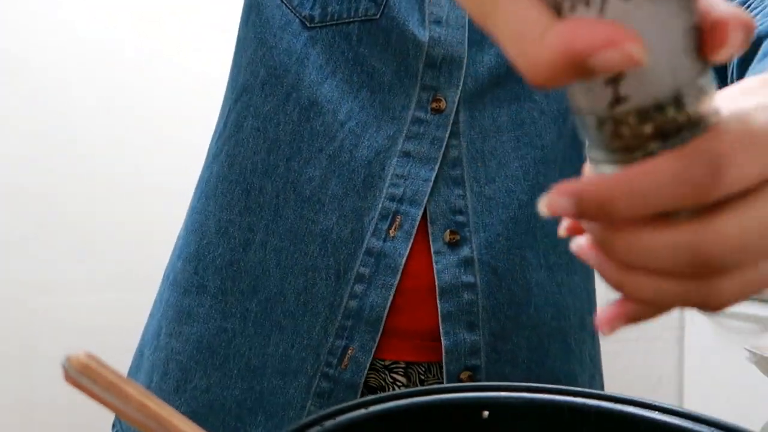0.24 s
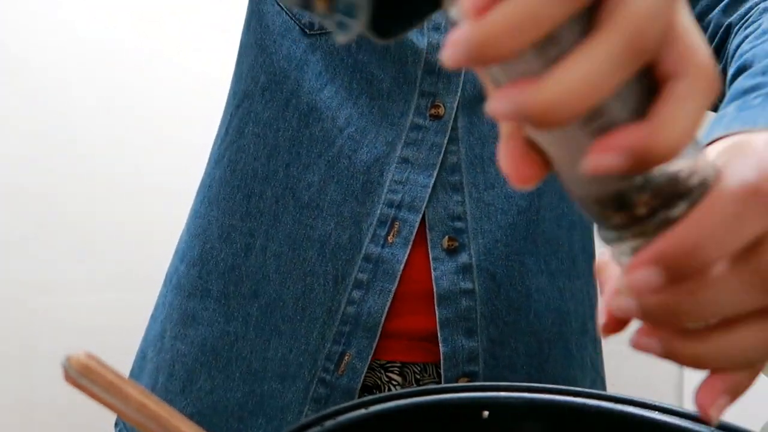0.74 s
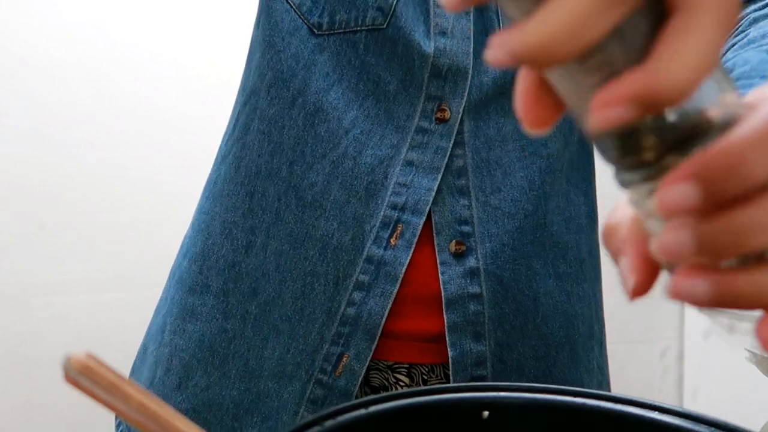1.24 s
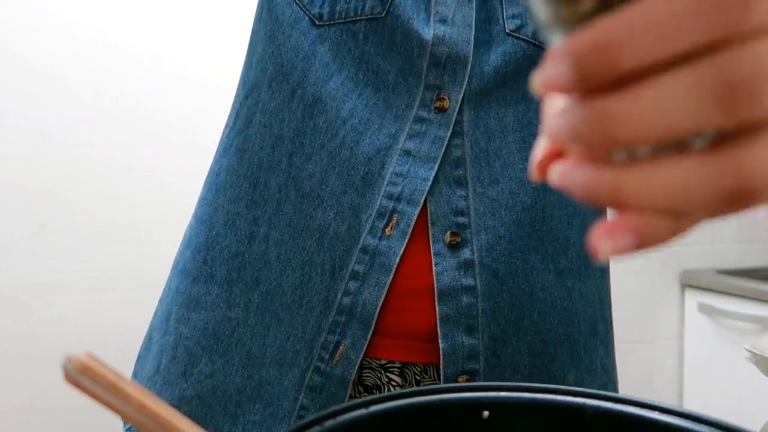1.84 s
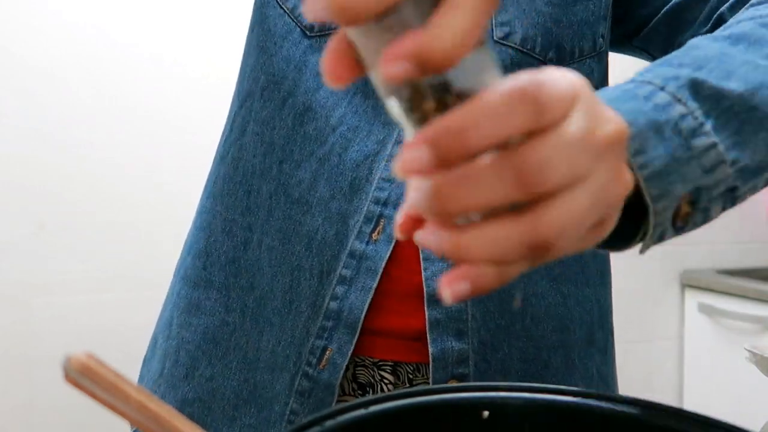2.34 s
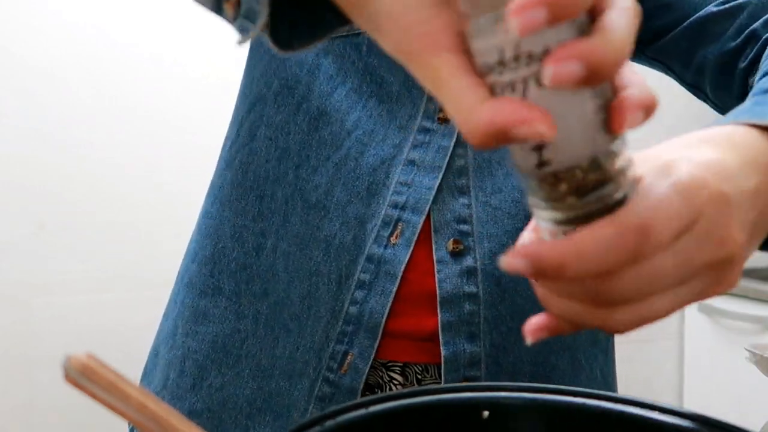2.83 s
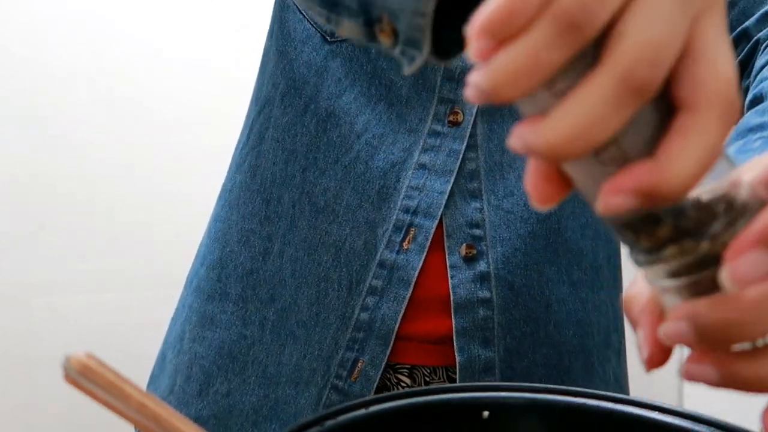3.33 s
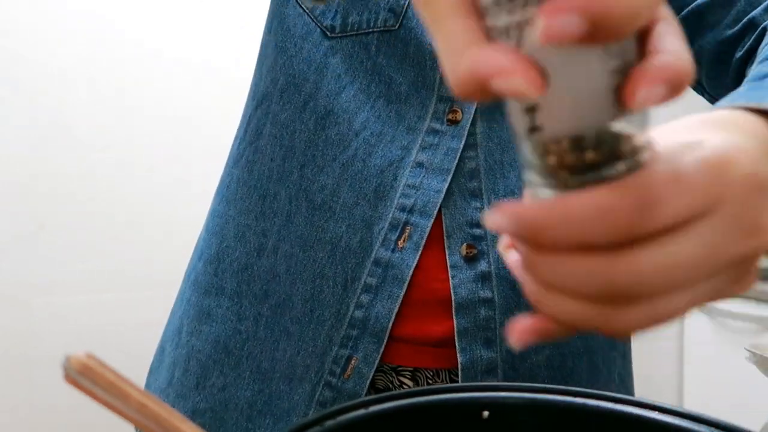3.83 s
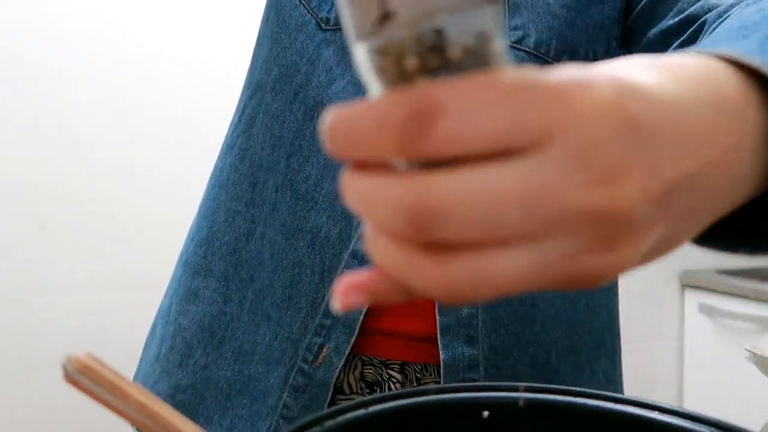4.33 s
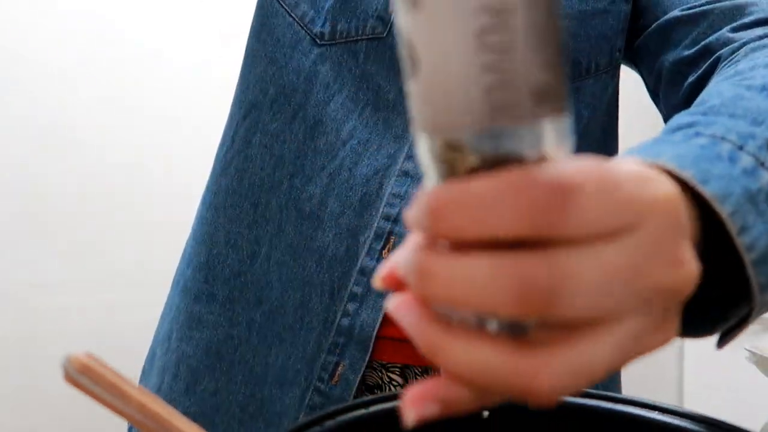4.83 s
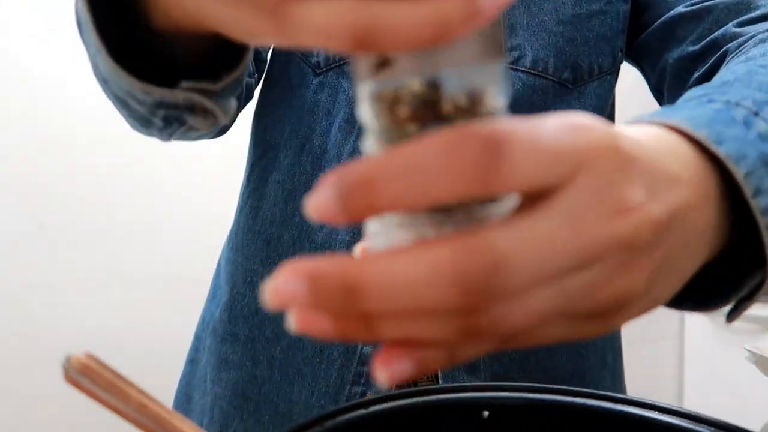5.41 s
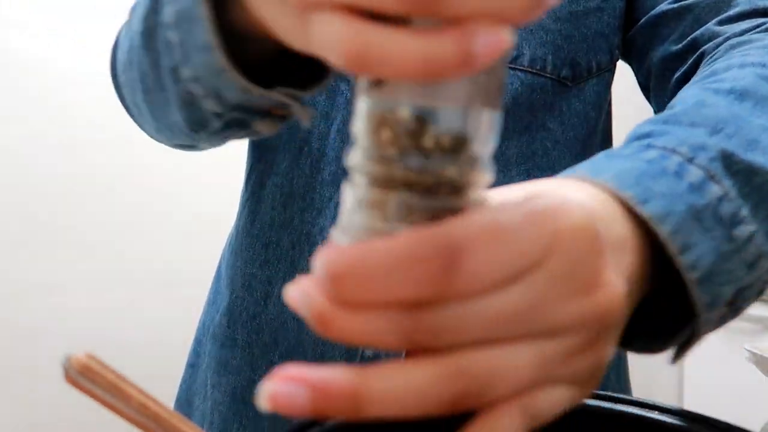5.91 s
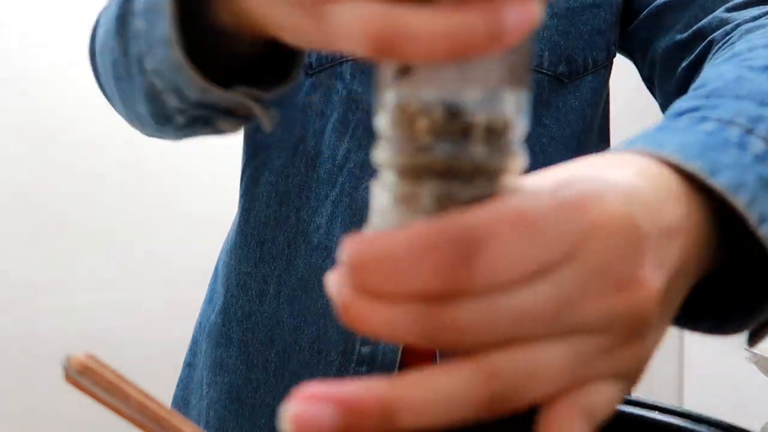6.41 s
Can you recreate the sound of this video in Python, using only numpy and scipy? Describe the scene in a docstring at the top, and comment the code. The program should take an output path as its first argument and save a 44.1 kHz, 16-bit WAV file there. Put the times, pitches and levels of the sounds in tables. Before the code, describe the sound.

Very close stereo sound of a plastic-and-glass pepper mill in a small kitchen. Short gritty rasps come about five a second, each peppered with sharp, dry cracks and faint loose ticks. After four and a half seconds the grinding nearly stops, a lone snap sounds, low arm rumble rises, and slower twists return with more body. Soft room air and a faint low appliance hum lie beneath.

```python
"""A hand pepper mill, twisted to and fro close by in a small kitchen, rasps grit and cracks whole corns.
Random tiny snaps (grit), single snaps (corns, chips, loose bits) drive the resonant modes of its body.
Noise-built reflections give the kitchen's brief answer; sines hum like an appliance.
Filtered noise is the room air and the faint rumble of the moving arms."""
import sys
import numpy as np
from scipy import signal
from scipy.fft import rfft, irfft
from scipy.io import wavfile
from scipy.ndimage import uniform_filter1d, map_coordinates

SR = 44100
rng = np.random.default_rng(int(sys.argv[2]) if len(sys.argv) > 2 else 0)


def materialize(psi):
    """Save the field psi as 16-bit PCM at rate SR to the path in sys.argv[1].

    A 1-D psi becomes a single channel; in a 2-D psi each row is a channel.
    """
    bounded = np.clip(np.atleast_2d(psi).T, -1, 1)
    quanta = np.round(bounded * 32767).astype(np.int16)
    wavfile.write(sys.argv[1], SR, quanta)


N = 293734


def from_db(db):
    """Decibels to amplitude gain."""
    return 10 ** (np.asarray(db) / 20)


def rms_one(x):
    """Scale to rms 1."""
    return x / np.sqrt(np.mean(x ** 2) + 1e-20)


def energy_one(x):
    """Scale to a sum of squares of 1."""
    return x / np.sqrt(np.sum(x ** 2) + 1e-20)


def at_hz(points, hz):
    """Interpolate a table on a log-frequency axis."""
    known_hz, values = np.transpose(points)
    return np.interp(np.log(np.maximum(hz, 1)), np.log(known_hz), values)


def at_s(points, s):
    """Interpolate a table in time."""
    known_s, values = np.transpose(points)
    return np.interp(s, known_s, values)


def butter(x, hz, kind, order=2):
    """Causal Butterworth filter."""
    return signal.sosfilt(signal.butter(order, hz, kind, fs=SR, output="sos"), x)


def resonate(x, hz, width_hz):
    """Two-pole resonance, peak gain about 1."""
    radius = np.exp(-np.pi * width_hz / SR)
    zeros = np.array([1, 0, -1]) * (1 - radius ** 2) / 2
    poles = [1, -2 * radius * np.cos(2 * np.pi * hz / SR), radius ** 2]
    return signal.lfilter(zeros, poles, x + 1e-18)


def coloured_noise(spectrum):
    """Steady Gaussian noise of a given spectrum, rms 1."""
    gain = from_db(at_hz(spectrum, np.fft.rfftfreq(N, 1 / SR)))
    return rms_one(irfft(rfft(rng.standard_normal(N)) * gain, N))


def add(track, s, sound):
    """Mix a two-row sound in at time s."""
    start = int(np.clip(round(s * SR), 0, N - 1))
    track[:, start:start + sound.shape[1]] += sound[:, :N - start]


def moments(per_s, count):
    """Uneven moments from time zero on, at a given mean rate."""
    return (np.arange(count) + rng.random(count)) / per_s


# room air spectrum: f/Hz, relative density/dB per Hz
AIR_SPECTRUM = [(20, -22), (42, -17), (70, -16.5), (150, -6.5), (200, -8.5), (260, -4), (340, -9.5),
                (500, -13.5), (1000, -20.5), (3000, -26), (7000, -36.5), (10000, -45), (15000, -61.5)]


def room_air(level_db=-54.8, side_db=-9, side_from_hz=130.4):
    """Steady noise common to both ports, plus a weaker opposed part above the bass."""
    common = coloured_noise(AIR_SPECTRUM)
    opposed = butter(coloured_noise(AIR_SPECTRUM), side_from_hz, "high") * np.array([[1], [-1]])
    return from_db(level_db) * (common + from_db(side_db) * opposed)


# appliance hum partials: f/Hz, rms level before wavering/dB
HUM_PARTIALS = [(43.1, -59.5), (150.3, -61), (242.6, -54.5), (285.6, -59.5)]


def appliance_hum(waver=0.59):
    """Sines whose levels each waver slowly and independently."""
    t = np.arange(N) / SR
    hum = np.zeros(N)
    for hz, db in HUM_PARTIALS:
        sine = np.sqrt(2) * np.sin(2 * np.pi * (hz * t + rng.random()))
        swell = 1 + waver * coloured_noise([(3, -6), (30, -53.5), (200, -120)])
        hum += from_db(db) * sine * swell
    return hum


# rumble of the arms, which move most while changing grip: t/s, relative level/dB
ARM_MOTION = [(0, -53), (2, -57), (4.8, -59), (5.9, -44), (6.25, -44), (6.4, -53), (6.66, -49)]
# rumble spectrum: f/Hz, relative density/dB per Hz
ARM_SPECTRUM = [(20, -17), (42, -5), (70, -2), (130, -6), (200, -7), (400, -16), (800, -23), (2000, -56)]


def arm_rumble(grinding, level_db=-1, push_db=-23):
    """Low noise that follows the arm motion and swells with each hard twist."""
    motion = from_db(at_s(ARM_MOTION, np.arange(N) / SR) + level_db)
    push = from_db(push_db) * uniform_filter1d(np.abs(grinding), size=SR // 20)
    return np.hypot(motion, push) * coloured_noise(ARM_SPECTRUM)


# kitchen reverberation: f/Hz, t60/s
ROOM_DECAY = [(300, 0.15), (1400, 0.31), (3000, 0.25), (6000, 0.37), (9000, 0.13), (15000, 0.067)]


def room_tail(white, t):
    """Band-filtered noise, each band dying at its own t60."""
    edges = np.geomspace(100, 19000, 10)
    tail = 0
    for k, (low_hz, high_hz) in enumerate(zip(edges, edges[1:])):
        band = butter(white[k % 2], [low_hz, high_hz], "band")
        tail = tail + band * from_db(-60 * t / at_hz(ROOM_DECAY, np.sqrt(low_hz * high_hz)))
    return tail


def kitchen(x, near_db=-8.0, near_t60_s=0.098, far_db=-15, build_up_s=0.0011,
            bass_spread_db=-12, diffuse_hz=3800, treble_spread_db=-3.2, stretches=16):
    """Quick reflections from body and worktop, then the room tail, shortest at the top."""
    t = np.arange(SR * 2 // 3) / SR
    build_up = 1 - np.exp(-(t / build_up_s) ** 2)
    far = room_tail(rng.standard_normal((2, 2, len(t))), t) * build_up
    echoes = np.zeros((2, N))
    # mill and hands keep moving: each stretch has its own quick reflections
    for stretch in np.array_split(np.arange(N), stretches):
        near = rng.standard_normal((2, len(t))) * from_db(-60 * t / near_t60_s) * build_up
        response = from_db(near_db) * energy_one(near) + from_db(far_db) * energy_one(far)
        answer = np.sqrt(2) * signal.fftconvolve(x[None, stretch], response, axes=1)
        add(echoes, stretch[0] / SR, answer)
    common, stray = echoes
    # sound from all around differs between the ports mostly in its short waves
    short_waves = butter(stray, diffuse_hz, "high", order=4)
    difference = from_db(bass_spread_db) * stray + from_db(treble_spread_db) * short_waves
    return np.array([common + difference, common - difference])


def microphone_pair(x, opposed_hz=7200, side_db=-3, bounce_db=-6, bounce_samples=14):
    """Two close ports: in step in the bass, drifting towards opposite phase in the treble."""
    forwards, sideways = x
    # short waves also reach both ports a moment later, off the casing
    delayed = np.pad(forwards, (bounce_samples, 0))[:N]
    bounce = butter(delayed, opposed_hz, "high", order=3)
    mid = butter(forwards, opposed_hz, "low", order=3) + from_db(bounce_db) * bounce
    side = from_db(side_db) * butter(sideways, opposed_hz, "high", order=3)
    return np.array([mid + side, mid - side])


# mill position, from the right to about the centre: t/s, right minus left level/dB
MILL_POSITION = [(0, 1.3), (3.6, 1.2), (4.5, 0.5), (6.66, -0.4)]
LAG_S_PER_DB = 0.000011


def place(x, shaded_hz=7000):
    """The nearer port hears the mill a little louder, and its longer waves earlier."""
    n = np.arange(N)
    pan_db = at_s(MILL_POSITION, n / SR)
    low_pass = signal.butter(3, shaded_hz, fs=SR, output="sos")
    out = []
    for port, db in zip(x, [-pan_db / 2, pan_db / 2]):
        long_waves = signal.sosfiltfilt(low_pass, port)
        shifted = map_coordinates(long_waves, [n + db * LAG_S_PER_DB * SR])
        out.append(from_db(db) * (port - long_waves + shifted))
    return np.array(out)


# mill modes, the last three being long rings of its jar: nominal f/Hz, width/Hz, relative energy/dB
MILL_MODES = [(440, 400, -23), (967, 160, -17.5), (1166, 256, -11.5), (1412, 213, -7.5), (1810, 560, -7),
              (2133, 293, -4.5), (2588, 493, -6), (2817, 165, -4), (3135, 160, -8.5), (3506, 283, -10.5),
              (4520, 1300, -13), (5280, 190, -17), (5770, 390, -14), (6045, 275, -7.5), (6203, 750, -7),
              (7470, 420, -9), (8070, 1500, -18.5), (11200, 3700, -20.5), (12300, 330, -26),
              (14100, 1000, -35.5), (2756, 35, -28), (6020, 35, -34.5), (7273, 30, -28.5)]


def mill(force, bass_db, treble_db, scatter_db, detune=0.019, directivity=0.7):
    """Body modes ring forwards and sideways (two rows); striking point and grip vary each ring."""
    hz, width_hz, db = np.transpose(MILL_MODES)
    strength, grip, lobe, turn = rng.standard_normal((4, len(MILL_MODES)))
    colour = [(1350, bass_db), (2200, 0), (3700, 1.2), (5600, treble_db)]  # f/Hz, gain/dB
    gains = from_db(db + at_hz(colour, hz))
    scattered = gains * from_db(scatter_db * strength)
    out = 0
    for k, gain in enumerate(scattered):
        ring = energy_one(resonate(force, hz[k] * (1 + detune * grip[k]), width_hz[k]))
        # the sideways lobe of each mode has its own strength and phase
        quadrature = energy_one(np.gradient(ring))
        sideways = energy_one((1 + directivity * lobe[k]) * ring + directivity * turn[k] * quadrature)
        out = out + (-1) ** k * gain * np.array([ring, sideways])
    # total energy does not depend on how the modes add up
    return np.linalg.norm(gains) * np.sqrt(2) * energy_one(out)


LEAD_S, LEAD_SWELL_S, LEAD_DB = 0.02, 0.005, -21


def snap(db, bass_db, treble_db, splinter_s, splinter_db=-7.5, scatter_db=2.1):
    """A faint crackle swells for LEAD_S before one impulse, then splinters."""
    lead = int(LEAD_S * SR)
    t = np.arange(-lead, SR // 12) / SR
    splinters = rng.standard_normal(len(t)) * (rng.random(len(t)) < .25)
    leading = from_db(LEAD_DB) * np.exp(-np.abs(t) / LEAD_SWELL_S)
    breaking = np.exp(-np.abs(t) / splinter_s)
    force = from_db(splinter_db) * splinters * np.where(t < 0, leading, breaking)
    force[lead] = 1
    level_over_5_ms = np.sqrt(.005 * SR) * from_db(db)
    return level_over_5_ms * mill(force, bass_db, treble_db, scatter_db)


# bits of pepper, in the burr or loose
CHIP_SPREAD_DB, CHIP_SPLINTER_S = 3, 0.0006
TICKS_PER_S, TICK_DB, TICK_BASS_DB, TICK_TREBLE_DB = 18, -49, 5, -7
# stretch without loose ticks: start t/s, end t/s
NO_TICKS_S = (4.65, 5.65)


def ticks(count=110):
    """Loose bits knock faintly and dully inside the mill, except in one stretch of few twists."""
    out = np.zeros((2, N))
    for s in moments(TICKS_PER_S, count):
        db = TICK_DB + CHIP_SPREAD_DB * rng.normal()
        tick = snap(db, TICK_BASS_DB, TICK_TREBLE_DB, CHIP_SPLINTER_S)
        if s < N / SR and not NO_TICKS_S[0] < s < NO_TICKS_S[1]:
            add(out, s, tick)
    return out


# cracking corns: t/s, relative level over 5 ms/dB, extra bass/dB, extra treble/dB, splinter decay/s
CORN_CRACKS = [(0.0708, -19.0, -3.5, -6.0, 0.004), (0.0843, -17.5, -10.0, -9.0, 0.004),
               (0.0898, -8.0, -8.0, -2.0, 0.002), (0.1361, -26.5, -5.0, -5.0, 0.0015),
               (0.15, -29, 3, -6, 0.0015), (0.2535, -29.0, -3.0, -9.0, 0.001),
               (0.2703, -19.5, -3.5, 8.5, 0.0003), (0.4273, -32, -4, 8, 0.002),
               (0.5161, -25, -10, -6, 0.0005), (0.6239, -36.5, 5.0, 0.0, 0.0007),
               (0.8211, -24.5, -10.0, 1.0, 0.004), (0.8358, -20.5, 4.0, -1.0, 0.002),
               (0.972, -40.0, -1.5, -4.5, 0.001), (1.1187, -31, -10, -6, 0.001),
               (1.1625, -37, -2, -8, 0.0014), (1.2056, -20.5, -3.5, -2.0, 0.004),
               (1.2227, -17.0, -6.5, -2.5, 0.004), (1.3718, -26.5, 2.5, 4.5, 0.0013),
               (1.4282, -30, 8, 10, 0.0003), (1.4489, -22, 0, -9, 0.002), (1.4765, -19.0, 1.5, -5.0, 0.003),
               (1.5755, -28.0, -1.0, -5.0, 0.001), (1.6134, -21, 0, -3, 0.003),
               (1.6514, -22.0, -7.0, 0.0, 0.0013), (1.662, -12, 0, 5, 0.0026),
               (1.8051, -24.5, -3.0, 3.5, 0.003), (1.9788, -11.5, -2.5, -5.5, 0.004),
               (2.0279, -25.5, -7.5, 7.0, 0.0004), (2.1404, -33, 4, 3, 0.003),
               (2.2478, -37.0, -0.5, 2.5, 0.001), (2.3953, -30.0, -8.5, 5.0, 0.002),
               (2.525, -28.0, -3.5, -6.0, 0.004), (2.5595, -18.0, -7.0, 3.0, 0.003),
               (2.595, -27.5, -5, -5, 0.002), (2.6787, -21, -3, -9, 0.0012),
               (2.7019, -23.0, -1.5, 3.5, 0.002), (2.7284, -13.5, -6.0, -7.5, 0.004),
               (2.8541, -24, -5, -3, 0.0045), (2.87, -12.5, -3.5, 1.0, 0.0004),
               (3.0012, -24, -8, -7, 0.005), (3.029, -15.5, -3.5, -1.0, 0.007),
               (3.0632, -20.0, -4.0, -6.0, 0.003), (3.2105, -18.5, -10.0, 2.5, 0.0009),
               (3.2642, -34.5, -5.0, 10.0, 0.0025), (3.3379, -22, -9, 0, 0.002),
               (3.359, -19.5, -1.0, 9.5, 0.003), (3.378, -21.5, -1.5, 2.0, 0.0016),
               (3.3988, -31, -8, 11, 0.0005), (3.541, -31, -6, 0, 0.0017), (3.5783, -25.5, -4, 7, 0.0012),
               (3.6151, -29.5, -5.0, 5.5, 0.0004), (3.7451, -23, -6, -9, 0.004),
               (3.8903, -23.0, -1.5, -2.5, 0.002), (3.9179, -20.0, -10.0, -2.0, 0.0026),
               (4.0901, -13.5, -10.0, -3.0, 0.0018), (4.2593, -35.5, 8.5, -8.5, 0.0013),
               (4.3226, -29.0, 7.0, 4.5, 0.001), (4.3431, -22, -4, -1, 0.002),
               (4.361, -25.0, 2.0, 5.0, 0.0018), (4.5135, -15.0, 5.0, -3.5, 0.0009),
               (4.536, -17.0, -2.0, 0.0, 0.0009), (4.5606, -15.0, -10.0, -3.0, 0.0014),
               (4.5826, -27.0, 1.0, 7.5, 0.0018), (4.6039, -23.0, 5.0, -1.5, 0.0009),
               (5.169, -41.5, 5.5, -3.5, 0.0007), (5.2, -44, 4, -9, 0.0014),
               (5.2813, -19.5, -0.5, 6.5, 0.0005), (5.6701, -30.0, 2.5, 1.5, 0.0027),
               (5.8023, -33.5, 7.0, 5.0, 0.0007), (5.9267, -39, 16, 0, 0.0009), (5.9866, -24, 12, 9, 0.001),
               (6.0298, -22.5, 4.5, -2.5, 0.004), (6.0958, -30.0, 4.5, -3.0, 0.0015),
               (6.1697, -28.0, 7.0, -1.5, 0.001), (6.236, -15.5, 0, 10, 0.001),
               (6.2681, -17.5, -6.0, -2.5, 0.0025), (6.4657, -39, 13, 0, 0.001),
               (6.5084, -35, 6, 1, 0.0007), (6.5691, -39, 9, -6, 0.0003), (6.6023, -30, 11, -3, 0.006),
               (6.6318, -25, 0, 5, 0.002)]


def cracks(level_db=0.6):
    """Whole corns break in the burr, one snap each."""
    out = np.zeros((2, N))
    for s, db, bass_db, treble_db, splinter_s in CORN_CRACKS:
        add(out, s - LEAD_S, snap(db + level_db, bass_db, treble_db, splinter_s))
    return out


def grains(per_s, spread_db, count):
    """Sparse impulses at random moments, of uneven size and either sign."""
    sizes = from_db(spread_db * np.minimum(rng.exponential(1, count), 3))
    signs = rng.choice([-1, 1], count)
    return sizes * signs * (rng.random(count) < per_s / SR)


TWIST_RISE_S, TWIST_SAG_DB_PER_S = 0.011, 25
GRIT_PER_S, TRICKLE_PER_S, GRIT_SPREAD_DB = 400, 35, 4.2
CHIPS_PER_S, CHIP_DB = 32, -2
# new grip near the end, fuller sound: t/s, extra bass of the rasp/dB
GRIP_BASS = [(0, 0), (5.3, -1), (5.9, 4), (6.66, 4)]
# twists of the cap, to and fro: start t/s, end t/s, relative rasp level at the start/dB, extra treble/dB
CAP_TWISTS = [(0.0, 0.05, -42, -4.0), (0.066, 0.155, -27.0, -4.0), (0.255, 0.29, -30.0, 4.0),
              (0.415, 0.464, -33, 0.0), (0.487, 0.53, -28, -4.0), (0.615, 0.669, -40.5, 0.0),
              (0.8, 0.872, -29.5, -4.0), (0.99, 1.06, -44, -1.5), (1.187, 1.264, -25.5, -2.5),
              (1.39, 1.497, -34, -5.5), (1.575, 1.65, -28, -1.5), (1.772, 1.83, -33.5, -1.0),
              (1.95, 2.029, -27.5, 1.0), (2.135, 2.2, -35.5, -2.5), (2.328, 2.385, -28, -1.5),
              (2.471, 2.6, -33.0, -2.0), (2.67, 2.745, -25, -3.0), (2.85, 2.875, -25, -1.0),
              (2.997, 3.068, -26.5, -3.0), (3.172, 3.238, -32.5, -1.0), (3.331, 3.41, -27, 3.0),
              (3.535, 3.614, -38.5, 4.5), (3.703, 3.77, -30, -1.5), (3.883, 3.924, -31.0, -1.5),
              (4.07, 4.095, -26.5, -6.5), (4.325, 4.38, -30.0, 0.5), (4.507, 4.62, -26.0, -4.0),
              (5.272, 5.33, -36.5, 6.0), (5.69, 5.82, -40.5, -4.0), (5.975, 6.11, -38.0, 0.0),
              (6.155, 6.279, -29, -0.5), (6.45, 6.515, -41, -1.0), (6.599, 6.66, -30, 5.0)]


def rasp(level_db=-1.5, scatter_db=2.5, trickle_db=-10, trickle_s=0.086, teeth=3):
    """A twist takes hold fast, eases as grit gives way and breaks chips; loose grit then trickles on."""
    out = np.zeros((2, N))
    t = np.arange(SR // 4) / SR
    for start, end, db, treble_db in CAP_TWISTS:
        length = end - start
        bass_db = at_s(GRIP_BASS, start)
        effort = from_db(db - TWIST_SAG_DB_PER_S * np.minimum(t, length))
        pressure = effort * (1 - np.exp(-t / TWIST_RISE_S)) * (t < length)
        fading = np.exp(-np.abs(t - length) / trickle_s) * (t >= length)
        settling = from_db(trickle_db) * effort * fading
        size = from_db(level_db) * np.linalg.norm(pressure) / np.sqrt(teeth)
        # several burr teeth bite at once, each with its own colour
        for tooth in range(teeth):
            crushing = pressure * grains(GRIT_PER_S, GRIT_SPREAD_DB, len(t))
            trickling = settling * grains(TRICKLE_PER_S, GRIT_SPREAD_DB, len(t))
            add(out, start, size * mill(crushing + trickling, bass_db, treble_db, scatter_db))
        # coarser chips snap one by one
        for s in moments(CHIPS_PER_S, count=5):
            size_db, dull_db, bright_db = CHIP_SPREAD_DB * rng.standard_normal(3)
            chip = snap(CHIP_DB + size_db, bass_db + dull_db, treble_db + bright_db, CHIP_SPLINTER_S)
            add(out, start + s - LEAD_S, chip * np.interp(s, t, pressure))
    return out


def scene():
    """The mill in its room, drifting from the right to about the centre."""
    grinding = cracks() + rasp() + ticks()
    forwards = grinding[0]
    direct = place(microphone_pair(grinding))
    background = room_air() + appliance_hum() + arm_rumble(forwards)
    return direct + kitchen(forwards) + background


CUTOFF_HZ = 15900


def record(dry):
    """Soft saturation rounds off the loudest snaps; a steep low-pass cuts the top."""
    rounded = dry / (1 + dry ** 6) ** (1 / 6)
    low_pass = signal.ellip(10, .2, 80, CUTOFF_HZ, fs=SR, output="sos")
    return signal.sosfilt(low_pass, rounded)


dry = scene()
out = record(dry)
materialize(out)
```